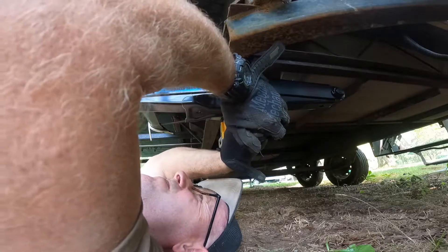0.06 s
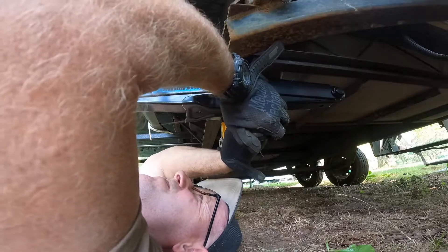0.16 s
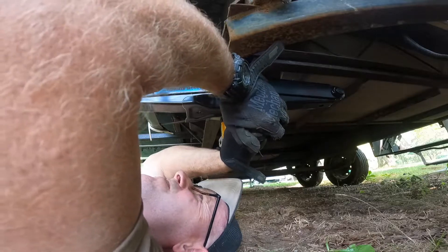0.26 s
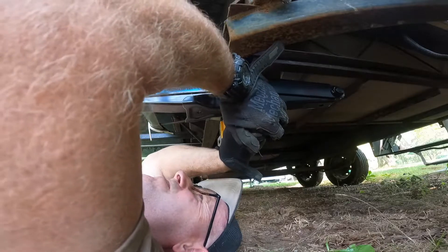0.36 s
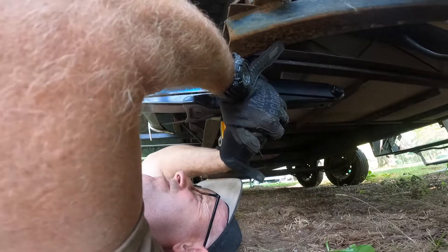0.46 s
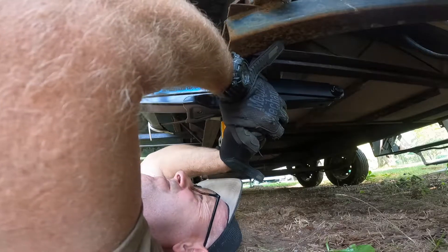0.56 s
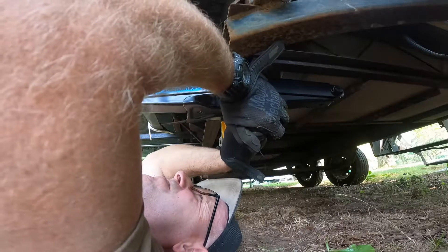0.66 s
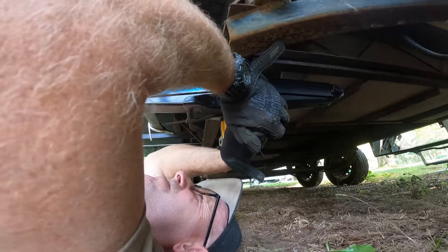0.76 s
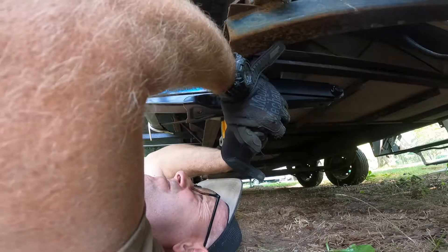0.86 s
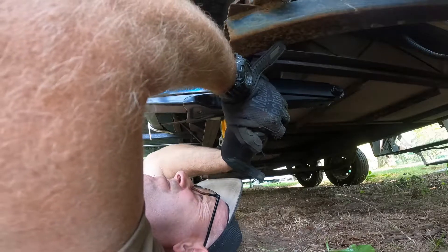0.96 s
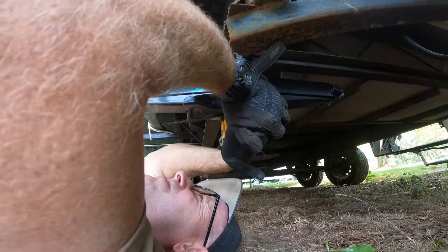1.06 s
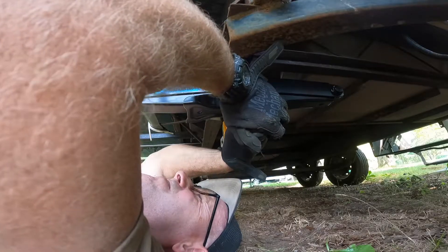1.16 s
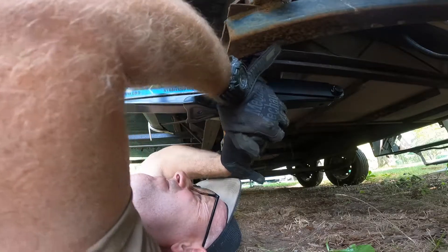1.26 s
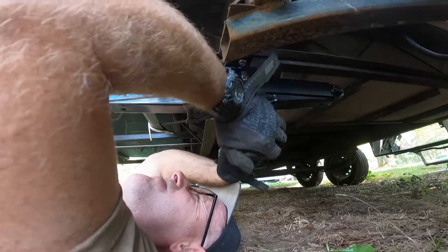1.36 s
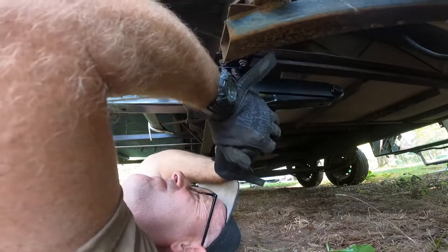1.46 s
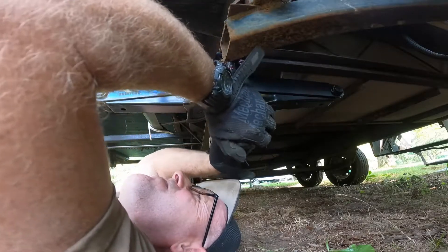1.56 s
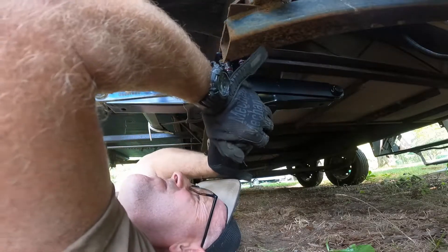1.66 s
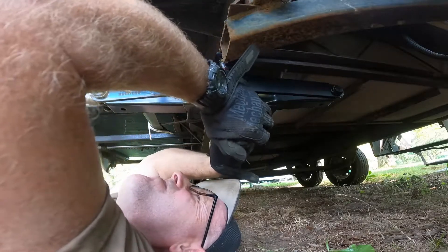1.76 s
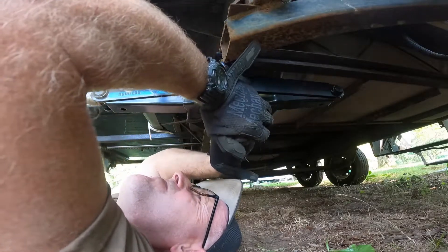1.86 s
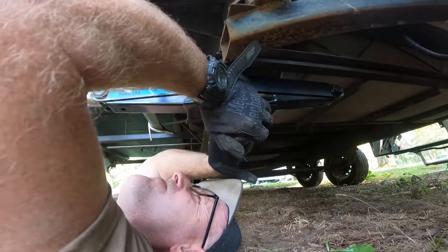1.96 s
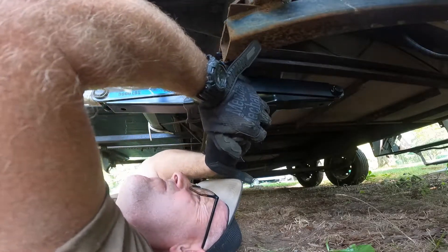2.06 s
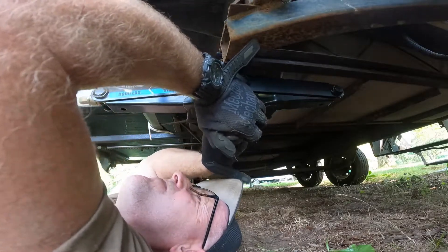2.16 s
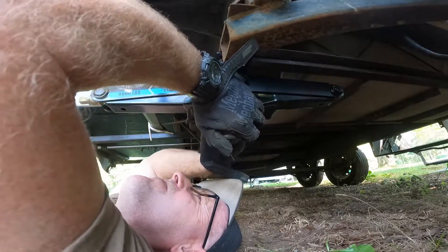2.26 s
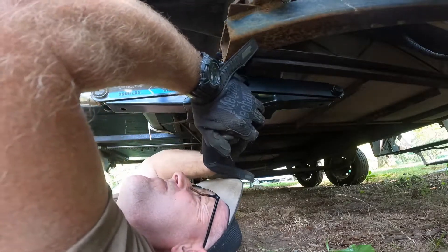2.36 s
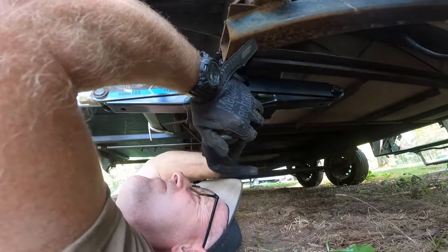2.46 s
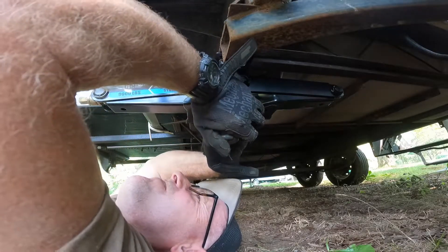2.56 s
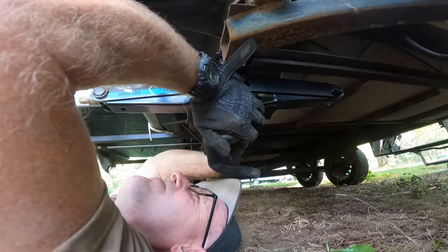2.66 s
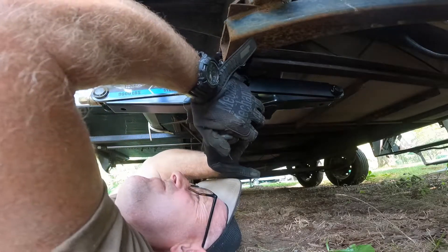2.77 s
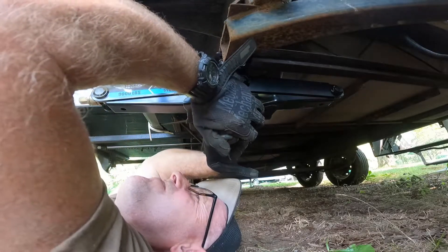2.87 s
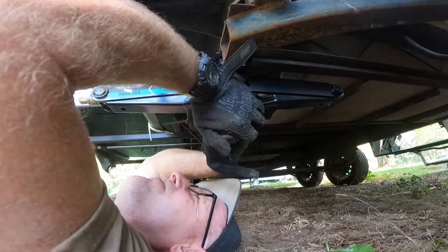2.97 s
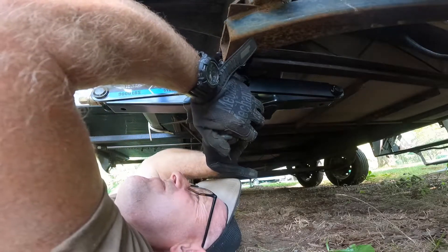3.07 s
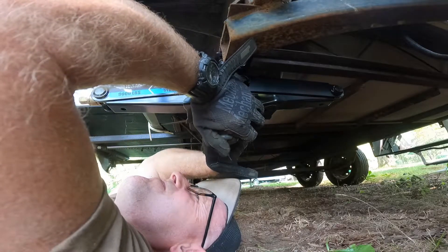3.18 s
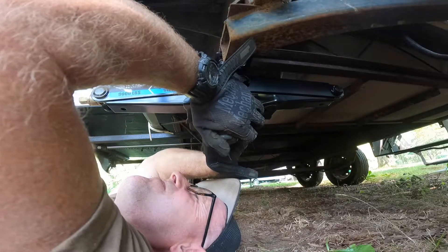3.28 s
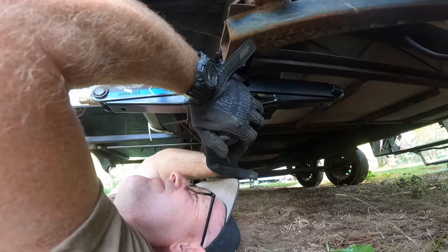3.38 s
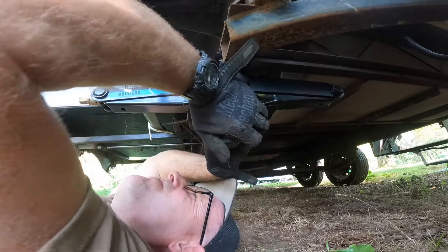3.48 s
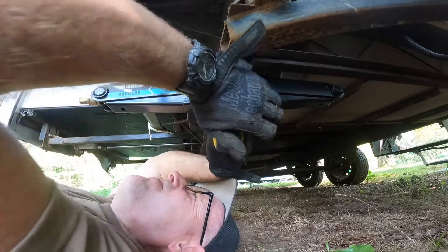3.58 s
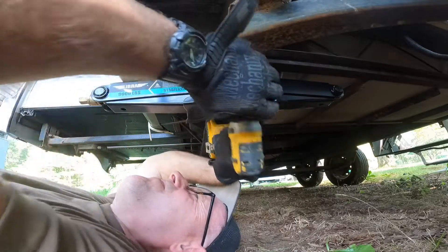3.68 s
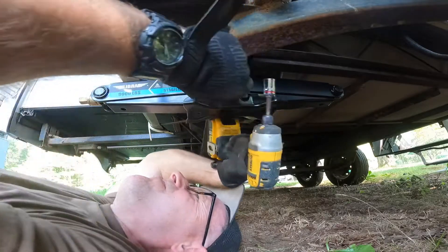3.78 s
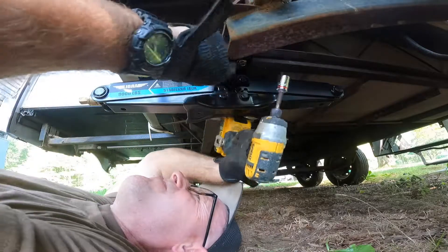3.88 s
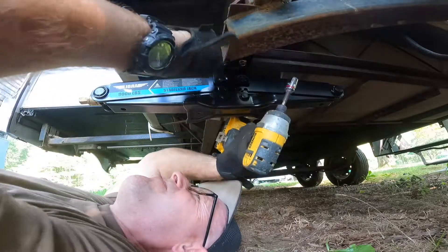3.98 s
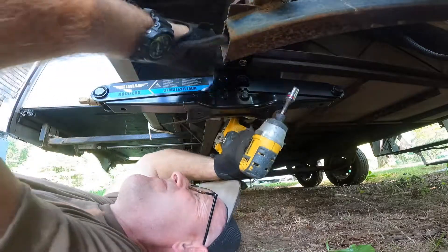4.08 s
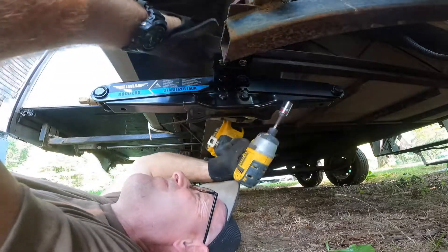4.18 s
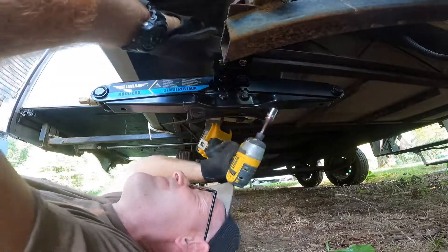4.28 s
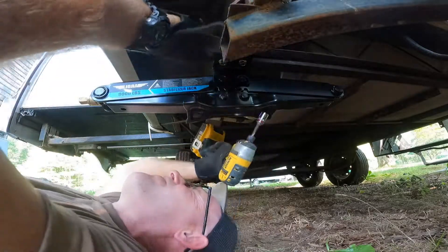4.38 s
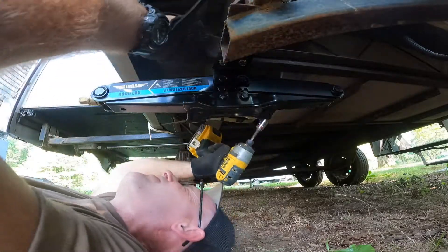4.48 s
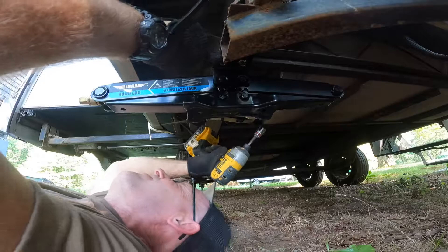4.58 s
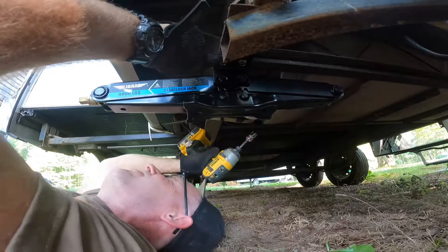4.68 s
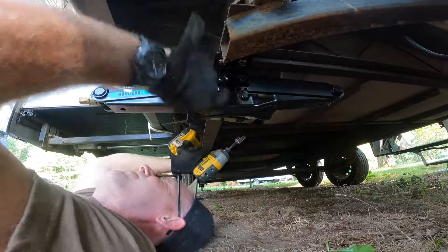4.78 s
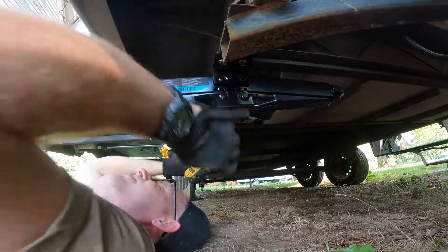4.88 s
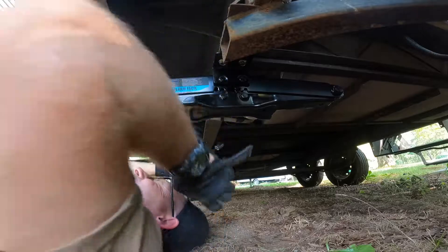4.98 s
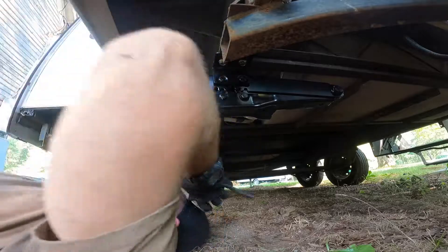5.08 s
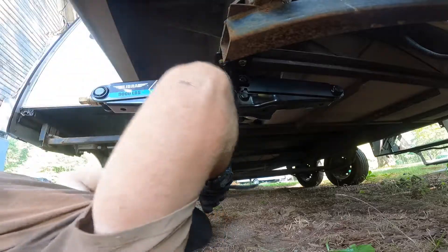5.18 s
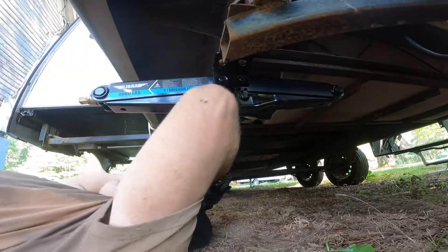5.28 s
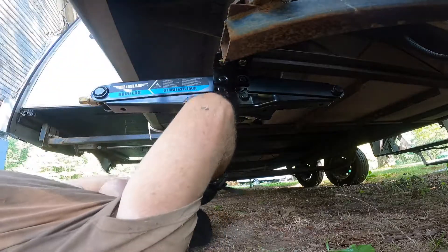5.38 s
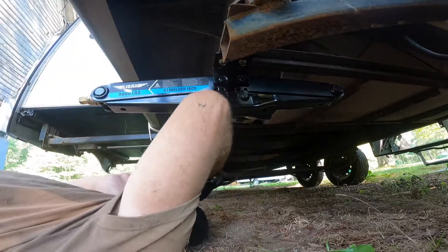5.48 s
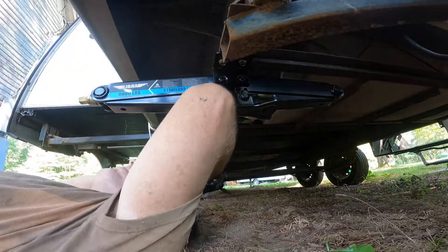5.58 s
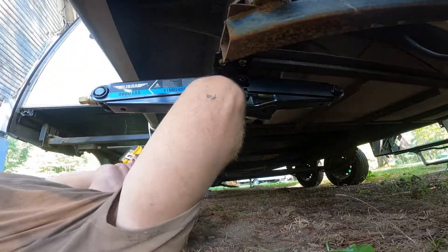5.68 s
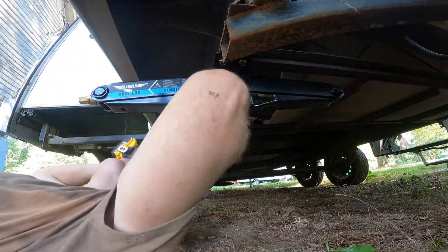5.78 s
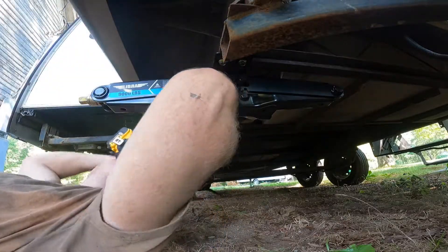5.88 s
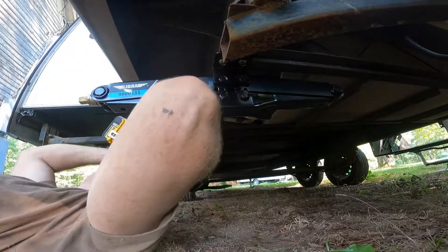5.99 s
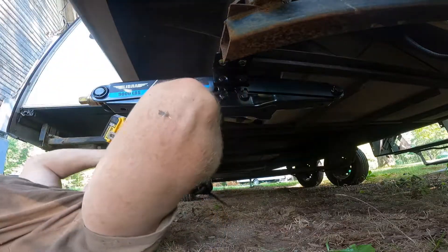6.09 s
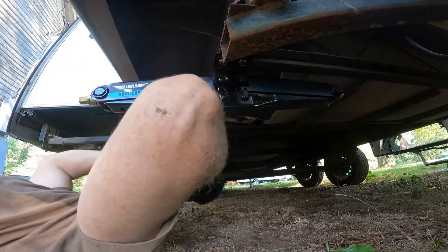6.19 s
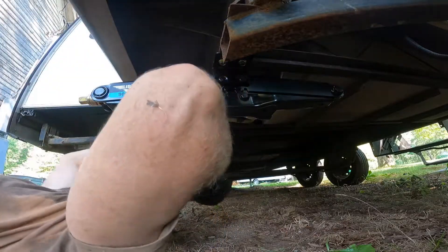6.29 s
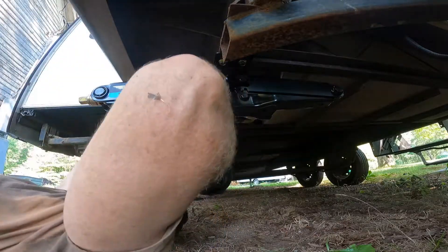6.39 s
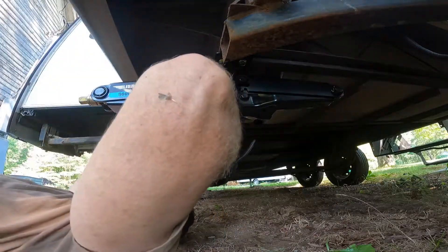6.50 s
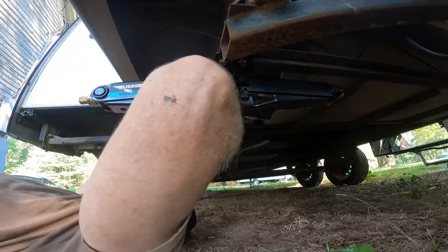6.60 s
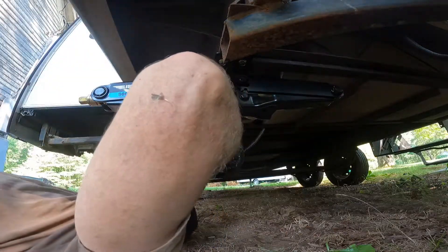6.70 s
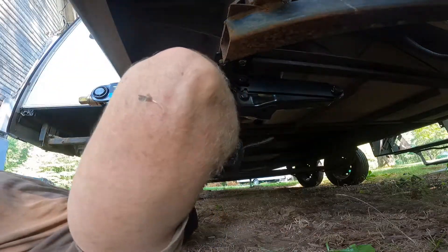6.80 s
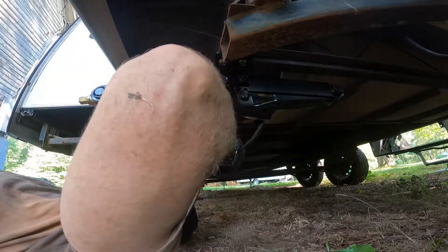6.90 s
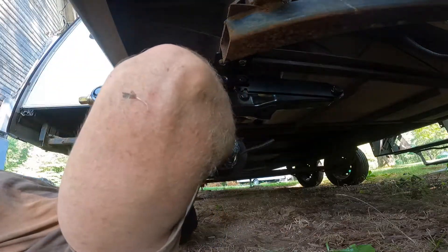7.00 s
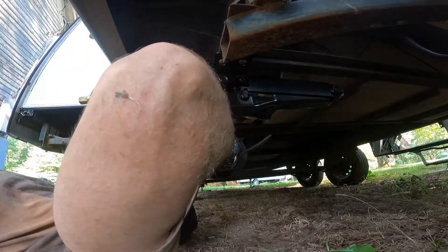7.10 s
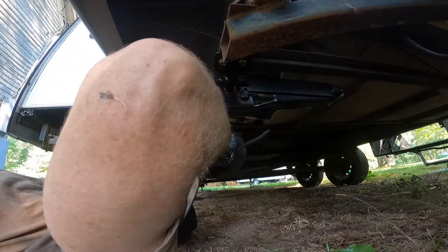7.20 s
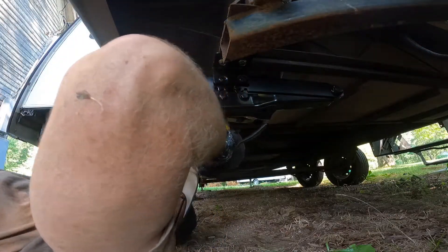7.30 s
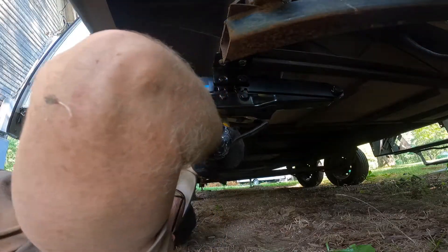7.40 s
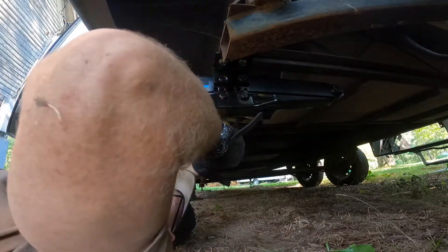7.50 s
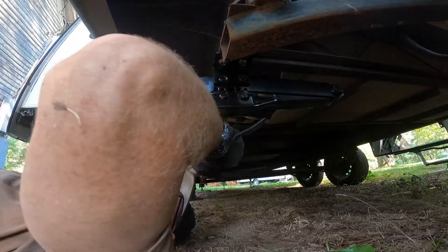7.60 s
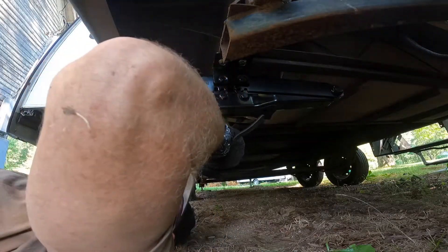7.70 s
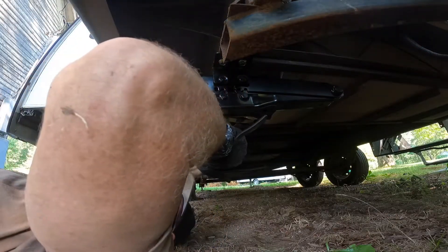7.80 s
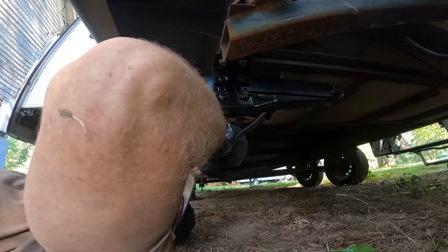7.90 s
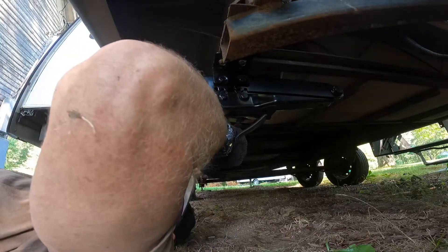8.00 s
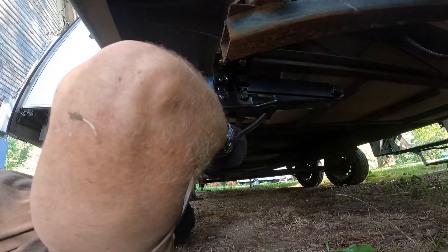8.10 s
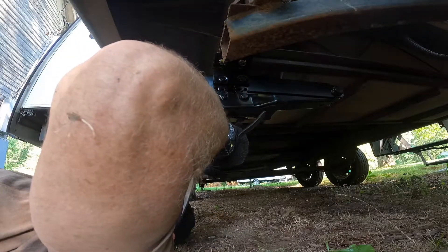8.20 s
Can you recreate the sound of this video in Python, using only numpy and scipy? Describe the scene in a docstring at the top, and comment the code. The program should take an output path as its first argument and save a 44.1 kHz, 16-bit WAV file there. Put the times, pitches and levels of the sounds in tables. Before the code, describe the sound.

Close, dry outdoor sound beneath a steel trailer. From about 0.1 s an impact driver spins up and hammers loudly until 1.4 s, about sixty blows a second, bright and clattering, its pace sagging and recovering near the end. The frame rings on. Small socket knocks scatter from 1.6 to 2.3 s, with a low soft rumble near 2.35 and a thin high whine swelling just before the second burst, 2.5 to 3.55 s, which slows as it ends and the motor runs down. A light tick follows at 3.65. At 4.4 to 4.7 s a wrench clinks sharply three times and chatters to rest. The faint far engine drone and low rush then rise, with light rustles near 5.7 and 6.0. A hard knock lands at 6.9, a cluster around 7.3, smaller ones after, then a short third burst from 7.7 s, with a last knock near 8.2.

```python
"""An engine drones far off as a cordless impact driver runs a bolt into a steel trailer frame, close by.
Its hammer strikes up to about sixty times a second, and each blow rings the steel. Then the socket knocks
on the frame, a low rumble is heard, the speed control whines and a second burst follows. A wrench clinks
and chatters to rest, the background level comes up, and more knocks lead to the third burst and a last knock.
Blows are pulses and noise sent through resonances; a limiter holds the loud parts down."""
import sys
import numpy as np
from scipy import signal
from scipy.fft import rfft, irfft
from scipy.io import wavfile
from scipy.ndimage import uniform_filter1d

SR = 44100
rng = np.random.default_rng(int(sys.argv[2]) if len(sys.argv) > 2 else 0)


def dump_mix(stems):
    """Bounce the given channels to the path in sys.argv[1] as a 16-bit WAV at rate SR."""
    frames = np.atleast_2d(stems).T  # one column per channel
    limited = np.clip(frames, -1, 1)  # hard clip at full scale
    pcm = np.round(limited * 32767).astype(np.int16)
    wavfile.write(sys.argv[1], SR, pcm)


N = 363825
TIME = np.arange(N) / SR  # seconds
TINY = 1e-18 * np.sin(np.arange(N))  # far too faint to hear; keeps filter inputs from being exactly zero

# Level of the background, which comes up later on. Each row: time in seconds, level in dB.
BACKGROUND = [(2.0, -58), (3.8, -59.5), (4.9, -51), (5.3, -48), (6.1, -42), (7.7, -41.5)]
# Steady tones of the far engine. Each row: pitch in Hz, relative level in dB.
DRONE = [(59.2, -60.5), (80.7, -57), (113.0, -53.5), (161.5, -43), (269.2, -57.5)]
# Tone colour of the outdoor rush. Each row: frequency in Hz, relative level in dB per Hz.
RUSH = [(15, -64), (25, -20), (43, -28), (128, -17), (162, -7.5), (217, -12.5), (260, -12.5), (808, -23.5),
        (997, -28), (4470, -41), (8500, -58.5), (11800, -58), (13500, -68)]

# Pulls of the trigger. Each row: time up to speed in seconds, spin-up in dB per second,
# extra whirr before the load in dB, time let go in seconds, run-down in dB per second.
PULLS = [(0.072, 400, 14.5, 1.2, 800), (2.48, 438, 5, 3.572, 260), (7.73, 3500, 2.5, 8.3, 235)]
WHIRR_DB, LOAD_S = -26.5, 0.036  # level of the gears under load; time in which the load slows them
COAST_DB, COAST_LOSS_DB_PER_S = -55, 39.5  # after the brake the gears coast faintly

# Tone colour of the blows. Each row: frequency in Hz, relative level in dB per Hz.
BOLT_COLOUR = [(240, -35.5), (400, -4.5), (553, -14), (641, 3), (886, -2.5), (1120, -0.5), (2110, -2),
               (2630, 1), (3700, -0.5), (4280, 0.5), (6760, -5.5), (8940, -7), (11800, -12.5),
               (13500, -29.5)]
# Resonances of bolt and bracket, one list for each run of hammering.
# Each row: pitch in Hz, width in Hz, relative level in dB.
BOLT_PEAKS = [
    [(1860, 58, 4), (1960, 320, 3.5), (2540, 30, -21.5), (3048, 170, 3.5), (3370, 330, -8), (4434, 33, 8),
     (4440, 110, -5.5), (6100, 98, -6.5), (7500, 24, -17)],
    [(1020, 750, -9.5), (2305, 18, 3), (2560, 200, -1), (2982, 37, 7.5), (4580, 110, -10), (5050, 40, 2.5),
     (6000, 170, -6.5)],
    [(2623, 56, -4), (3876, 63, 9), (3908, 77, 6.5), (4560, 61, -11.5), (5106, 54, 5), (5630, 64, -2.5),
     (6040, 55, 2.5), (6790, 140, 5)],
    [(710, 85, -19), (2662, 160, 5.5), (3340, 110, -5), (3760, 39, 4.5), (4133, 54, -4), (5750, 39, 0.5),
     (6270, 43, -30.5)],
]
# Low resonances of the chassis. Each row: pitch in Hz, width in Hz, relative level in dB.
CHASSIS = [(60.3, 16, -17.5), (125.4, 52, -4.5), (159, 37, 3), (202, 29, 0.5), (241.7, 21, 5), (292, 31, 5),
           (397.4, 16, -8), (493, 110, -11)]
# Resonances of the bracket, which sing when a multiple of the hammer rate meets them.
# Each row: pitch in Hz, width in Hz, relative level in dB.
BRACKET = [(627.6, 18, 10), (1823, 30, 1.5), (1920, 290, -5), (3355, 160, 3.5), (4410, 34, -0.5)]
# Resonances of the floor panel. Each row: pitch in Hz, width in Hz, relative level in dB.
PANEL = [(81, 15, -1), (139, 23, 4)]
# Hammer speed, one list for each run; the first burst has two runs, as the bolt takes up load.
# Each row: time in seconds, blows per second.
SPEED = [
    [(.077, 37.9), (.2, 57.3), (.4, 63.2), (.65, 63.1), (.79, 62)],
    [(.799, 63.3), (.9, 61.6), (1.0, 54.3), (1.15, 58.8), (1.25, 48.8), (1.405, 62.1)],
    [(2.508, 31.4), (2.6, 48.3), (2.82, 58.1), (3.36, 57.3), (3.46, 51.5), (3.55, 46.9)],
    [(7.737, 44.5), (7.86, 53.8), (8.02, 63.1), (8.245, 61.9)],
]
# Force of each run, and how it begins and ends. Each row: clatter in dB, mid-range rattle in dB,
# frame shudder in dB, looseness from 0 to 1, change of shudder in the bite in dB, floor boom in dB,
# fade at the end in dB.
RUNS = [(-13.5, -33.5, -38.5, 0.4, 13, -38, 1), (-13.5, -22.5, -32.5, .75, -8.5, -61, 13),
        (-13.5, -22.5, -33.5, .55, 6, -30.5, 3.5), (-13, -27.5, -35, .62, 20.5, -31, 0)]
BITE_LEAD_S, BITE_PEAK_S = 0.014, 0.075  # the bite starts before the first blow; time from there to its peak
BITE_IN_CLATTER, BITE_IN_RATTLE = 0.17, 0.75  # shares of the shudder's dB change
UNSEAT_S, FADE_S = 0.083, 0.037  # towards the end of a run the socket works loose, then the blows fade

# Long ring of the frame. Each row: pitch in Hz, relative level in dB, time to fall by 60 dB in seconds.
FRAME = [(402, 2.5, 3.8), (629, -3, 0.52), (688, -4, 0.33), (996, -4.5, 0.946), (2175, -5, 0.21),
         (2637, -8, 0.072), (3010, -5, 0.16), (3747, -15, 0.27), (5750, -17.5, .4)]

# The socket knocks on bolt and frame. Each row: time in seconds, relative level in dB,
# bass boost in dB, treble boost in dB.
KNOCKS = [(1.639, -22.5, -15, 8), (1.747, -33.5, 9.5, 3), (1.792, -36.5, -7, 11), (1.84, -41, -5, 11.5),
          (1.872, -32.5, -20, 16.5), (1.939, -40.5, -22, 18.5), (2.011, -43, 2.5, -8),
          (2.205, -44.5, 19, 9), (2.29, -42, 11, -5), (2.329, -30.5, 12.5, -1), (3.653, -35, -0.5, 16),
          (4.88, -44, 20.5, -6), (6.91, 3.5, -22.5, -22), (7.268, -1.5, -17, 3.5), (7.287, -5, 1.5, 6.5),
          (7.322, -4, 1, 4), (7.378, -29, 27.5, 9), (7.53, -19, 14, 8.5), (7.629, -35.5, 22, 3),
          (8.225, -2.5, 3, -14)]
# Tone colour of the knocks. Each row: frequency in Hz, relative level in dB per Hz.
KNOCK_COLOUR = [(240, -57), (400, -30), (660, -2.5), (926, -10), (1880, -7), (2380, -11.5), (4350, -2.5),
                (8940, -24.5), (10700, -26.5), (13500, -39.5)]
# Resonances of the knocked steel. Each row: pitch in Hz, width in Hz, relative level in dB.
KNOCK_PEAKS = [(674, 20, 3.5), (1530, 22, 0), (1780, 9.4, -4.5), (1850, 57, 2), (2673, 24, -5),
               (3130, 92, -2), (3940, 14, -9.5), (4500, 92, -4), (5330, 29, -0.5)]
# The 60 dB fall time of a knock at 0 dB in KNOCKS, and the rise in level that doubles this time.
KNOCK_T60_S, KNOCK_T60_DOUBLES_DB = 0.12, 60

# Soft rustles, a low rumble and a scrape. Each row: middle in seconds, half length in seconds,
# level in dB, centre in Hz, width in Hz.
RUSTLES = [(2.35, 0.11, -45.5, 239, 200), (4.0, 0.1, -62, 3500, 4000), (4.917, 0.046, -53.5, 2000, 2500),
           (5.68, 0.15, -52, 3900, 7040), (5.97, 0.18, -46, 1980, 600), (7.466, 0.016, -49, 4000, 3000),
           (7.66, .02, -42.5, 1279, 1600)]

# A light trigger makes the speed control whine. Each row: on in seconds, full in seconds, off in seconds.
# A row that goes off before it comes on stays silent.
WHINES = [(2.245, 2.423, 2.505), (7.725, 7.728, 6.9)]
# Steady second and third multiples of the whine's pitch. Each entry: level in dB.
WHINE_PARTS = [-68, -74]
WHINE_HZ, WHINE_DB, WHINE_SWELL_DB_PER_S = 3910, -37, 220  # the lowest tone

# Touches that ring at one pitch: dull bumps, and the socket slipping off its bolt.
# Each row: start in seconds, peak dB, pitch in Hz, rise in seconds.
BUMPS = [(4.314, -38.5, 345, .003), (3.654, -38.5, 2610, 0.0079), (7.378, -26, 362, 0.0034)]

# The wrench drops on the steel. Each row: time in seconds, relative level in dB, bass boost in dB,
# treble boost in dB, time for the clatter to fall by 60 dB in seconds.
CLINKS = [(4.412, -1, 0, -8, 0.036), (4.472, -0.5, -24, -2, 0.041), (4.559, -12, 7.5, 7.5, 0.055)]
# Tone colour of the clinks. Each row: frequency in Hz, relative level in dB per Hz.
CLINK_COLOUR = [(240, -65), (400, -61), (631, -2.5), (899, -14.5), (997, -4), (1740, -33.5), (1960, -11),
                (3140, 5), (5040, -7), (5750, -2.5), (13500, -32)]
# Resonances of the clinks. Each row: pitch in Hz, width in Hz, relative level in dB.
CLINK_PEAKS = [(1764, 49, 5), (2870, 18, -4), (3600, 62, -10), (4160, 60, -9), (4250, 24, 5),
               (5460, 54, -16), (6250, 49, -3), (6600, 48, -2)]
SETTLE_S, SETTLE_GAP_S = 4.609, 0.0285  # the wrench then chatters to rest: first tap, time between taps
# Relative level of the first tap, loss at each further tap, and the 60 dB fall time of a tap.
SETTLE_DB, SETTLE_LOSS_DB, SETTLE_T60_S = -29.5, 3.5, 0.067

CUTOFF_HZ = 13500  # top of the finished sound


def from_db(db):
    """Turn decibels into a gain."""
    return 10 ** (np.asarray(db) / 20)


def rms_one(x):
    """Scale a sound to unit power."""
    return x / np.sqrt(np.mean(x ** 2) + 1e-20)


def cut(x, hz, kind, order=2):
    """Keep only the low, high or band part of a sound (Butterworth filter)."""
    sos = signal.butter(order, hz, kind, fs=SR, output="sos")
    return signal.sosfilt(sos, x + TINY[:len(x)])


def drift(rate):
    """Chance that wanders between random points, `rate` of them a second, with a spread near 1."""
    knots = rng.standard_normal(4000)
    return np.interp(TIME * rate, np.arange(len(knots)), knots)


def colour(x, spectrum):
    """Give a sound a tone colour, with no sound ahead of its cause (minimum phase) and unit power gain."""
    size = 4096
    hz, db = np.transpose(spectrum)
    bins_hz = np.arange(size // 2 + 1) * SR / size
    level = np.interp(np.log(bins_hz + 1), np.log(hz), db)
    # folding the cepstrum forwards gives the minimum-phase response
    cepstrum = irfft(np.log(from_db(level)))
    cepstrum[1:size // 2] *= 2
    cepstrum[size // 2 + 1:] = 0
    response = irfft(np.exp(rfft(cepstrum)))
    return signal.oaconvolve(x, response / np.linalg.norm(response))[:len(x)]


def resonate(x, peaks):
    """Ring resonances side by side, with alternating signs; a narrower one rings longer."""
    out = 0
    for k, (hz, width, db) in enumerate(peaks):
        r = np.exp(-np.pi * abs(width) / SR)
        poles = [1, -2 * r * np.cos(2 * np.pi * hz / SR), r * r]
        ring = signal.lfilter([1, 0, -1], poles, x + TINY)
        out = out + (-1) ** k * from_db(db) * (1 - r * r) / 2 * ring
    return out


def steel(force, spectrum, peaks, peaks_db):
    """A steel part rings as a dense bed of modes with a few that stand out."""
    bed, rings = colour(force, spectrum), resonate(force, peaks)
    matched = rings * bed.std() / rings.std()
    return (bed + from_db(peaks_db) * matched) / np.hypot(1, from_db(peaks_db))


def levelled(x, window=0.057):
    """Even out the power over a few blows."""
    power = np.maximum(uniform_filter1d(x * x, int(window * SR)), 0)
    return x / np.sqrt(power + 0.3 * np.var(x))


def outdoors(drone_db=0.0, low_db=-6.0, low_follows=0.89, high_db=-8.5, waver=0.88, flutter_db=0.0):
    """A far engine's wavering tones lie over a broad rush of noise; all rise and fall together."""
    level = np.interp(TIME, *np.transpose(BACKGROUND))
    lines = 0
    for hz, db in DRONE:
        gain = from_db(db + flutter_db * drift(14))
        lines = lines + gain * np.sin(2 * np.pi * hz * TIME + waver * drift(14))
    air = colour(rng.standard_normal(N), RUSH)
    low = from_db(low_follows * level + low_db) * rms_one(cut(air, 750, "low", order=3))
    high = from_db(level + high_db) * rms_one(cut(air, 1000, "high", order=3))
    return from_db(level + drone_db) * rms_one(lines) + low + high


def motor(grain_db=2.5, top_hz=5200):
    """Gears rattle the socket: they spin up, are slowed by the load, then brake and coast once let go."""
    level = 0
    for up, rise, free_db, off, fall in PULLS:
        free = free_db * np.exp(-np.maximum(TIME - up, 0) / LOAD_S)
        spin_up = rise * np.clip(up - TIME, 0, 0.5)
        run_down = fall * np.clip(TIME - off, 0, 0.5)
        coast = from_db(COAST_DB - COAST_LOSS_DB_PER_S * np.abs(TIME - off))
        level = level + from_db(WHIRR_DB + free - spin_up - run_down)
        level = level + (TIME > off) * coast
    gears = cut(rng.standard_normal(N) * from_db(grain_db * drift(400)), top_hz, "low")
    return level * rms_one(steel(gears, BOLT_COLOUR, BOLT_PEAKS[1], peaks_db=-15.5))


def panel():
    """The trailer's floor is shaken at its two lowest modes, by noise."""
    return rms_one(cut(resonate(rng.standard_normal(N), PANEL), [55, 200], "band"))


def runs_in_time():
    """Give the current run's row at every moment, its bite (0 to 1) and the time left in it (seconds)."""
    starts, stops = np.transpose([(run[0][0] - BITE_LEAD_S, run[-1][0]) for run in SPEED])
    current = np.maximum(np.searchsorted(starts, TIME) - 1, 0)
    age = np.maximum(TIME - starts[current], 0) / BITE_PEAK_S
    bite = age * np.exp(1 - age)
    left = np.maximum(stops[current] - TIME, -FADE_S)
    return np.array(RUNS)[current].T, bite, left


def blow_times(speed):
    """One blow falls each time the hammer has turned on to its next lug."""
    t = np.arange(speed[0][0], speed[-1][0], 1 / SR)
    turned = np.cumsum(np.interp(t, *np.transpose(speed))) / SR
    return np.interp(np.arange(int(turned[-1]) + 1), turned, t)


def hammer(speed, loose, clatter_t60=0.1, crack_db=-11.5, crack_t60=0.0097, uneven_db=2.0,
           slip_s=0.00037, repeat_hz=1400):
    """Each blow sets off chatter: partly the same every time, partly new when the socket is loose."""
    at = blow_times(speed)
    chance = rng.standard_normal((len(at), 2))
    at = at + slip_s * np.interp(at, TIME, loose) ** 4 * chance[:, 0]
    blows = np.zeros(N)
    blows[np.clip(at * SR, 0, N - 1).astype(int)] = from_db(uneven_db * chance[:, 1])
    t = TIME[:SR // 8]
    dying = from_db(-60 * t / clatter_t60) + from_db(crack_db - 60 * t / crack_t60)
    alike = signal.oaconvolve(blows, dying * rng.standard_normal(len(t)))[:N]
    fresh_power = np.abs(signal.oaconvolve(blows ** 2, dying ** 2)[:N])
    fresh = np.sqrt(fresh_power) * rng.standard_normal(N)
    # small slips scramble the treble first; the long waves repeat more faithfully
    bass = np.sqrt(1 - loose ** 3) * alike + np.sqrt(loose ** 3) * fresh
    treble = np.sqrt(1 - loose) * alike + np.sqrt(loose) * fresh
    return blows, cut(bass, repeat_hz, "low", order=1) + cut(treble, repeat_hz, "high", order=1)


def driver(peaks_db=-3.5, shake_db=7.0, sing_db=-34.5):
    """Blows ring bolt and bracket and shake the chassis; the first bite changes their level."""
    (high, mid, low, play, bite_db, boom_db, fade_db), bite, left = runs_in_time()
    loose = np.clip(play + (1 - play) * np.maximum(bite, np.exp(-left / UNSEAT_S)), 0, 1)
    extra, fade = bite_db * bite, fade_db * np.exp(-left / FADE_S)
    blows, forces = zip(*[hammer(speed, loose) for speed in SPEED])
    all_blows = sum(blows)

    metal = sum(steel(force, BOLT_COLOUR, peaks, peaks_db) for force, peaks in zip(forces, BOLT_PEAKS))
    clatter = from_db(high + BITE_IN_CLATTER * extra) * levelled(cut(metal, 1700, "high", order=3))
    rattle = from_db(mid + BITE_IN_RATTLE * extra) * levelled(cut(metal, 1600, "low", order=3))

    push = rms_one(all_blows) + from_db(shake_db) * loose ** 2 * rms_one(sum(forces))
    shaken = cut(resonate(push, CHASSIS), [50, 580], "band", order=3)
    shudder = from_db(low + extra) * levelled(shaken)

    seated = (1 - loose) ** 2  # a well seated socket passes the blow straight on
    sing = from_db(sing_db) * rms_one(resonate(seated * all_blows, BRACKET))
    boom = from_db(boom_db) * bite ** 2 * panel()
    return from_db(-fade) * (clatter + rattle + shudder) + sing + boom


def frame_ring(x):
    """The long beams go on ringing after they are struck."""
    # a mode's width in Hz follows from how fast it dies away
    return resonate(x, [(hz, np.log(1000) / (np.pi * t60), db) for hz, db, t60 in FRAME])


def strikes(events, tail_db, tail_t60):
    """Steel meets steel: a dense clatter that dies fast, and a weak tail from under the chassis."""
    force, t = np.zeros(N + SR), TIME[:SR // 2]
    for s, db, bass_db, treble_db, t60 in events:
        dying = from_db(-60 * t / max(t60, 0.005)) + from_db(tail_db - 60 * t / tail_t60)
        hit = rng.standard_normal(len(t)) * dying
        hit = hit + (from_db(bass_db) - 1) * cut(hit, 1100, "low", order=1)
        hit = hit + (from_db(treble_db) - 1) * cut(hit, 4700, "high", order=1)
        start = int(s * SR)
        force[start:start + len(t)] += from_db(db) * hit
    return force[:N]


def socket_knocks(knock_db=-9.0):
    """The socket knocks on bolt and frame; harder knocks clatter longer."""
    events = []
    for s, db, bass, treble in KNOCKS:
        events.append((s, db, bass, treble, KNOCK_T60_S * 2 ** (db / KNOCK_T60_DOUBLES_DB)))
    force = strikes(events, tail_db=-16.5, tail_t60=0.21)
    return from_db(knock_db) * steel(force, KNOCK_COLOUR, KNOCK_PEAKS, peaks_db=-5.5)


def rustle(per_s=2500, size_db=0.5, clump_db=3.0):
    """Each handling noise swells and fades: clumps of tiny snaps with a colour of their own."""
    size = from_db(size_db * np.minimum(rng.exponential(1, N), 4))
    snaps = (rng.random(N) < per_s / SR) * rng.standard_normal(N) * size
    snaps = cut(snaps, 7000, "low") * from_db(clump_db * drift(25))
    out = 0
    for s, half, db, hz, width in RUSTLES:
        swell = np.exp(-np.minimum(((TIME - s) / half) ** 2, 20))
        out = out + from_db(db) * swell * rms_one(resonate(snaps, [(hz, width, 0)]))
    return out


def whine(edge_s=0.005):
    """The speed control whines as the trigger is squeezed: the lowest tone swells under steady overtones."""
    out, phase = 0, 2 * np.pi * WHINE_HZ * TIME
    overtones = sum(from_db(db) * np.sin(k * phase) for k, db in enumerate(WHINE_PARTS, 2))
    for on, full, off in WHINES:
        gate = np.clip(np.minimum(TIME - on, off - TIME) / edge_s, 0, 1)
        swell = from_db(WHINE_DB - WHINE_SWELL_DB_PER_S * np.clip(full - TIME, 0, 1))
        out = out + gate * (swell * np.sin(phase) + overtones)
    return out


def touches():
    """A light touch is one sine tone that rises quickly and dies away."""
    out = 0
    for s, db, hz, rise in BUMPS:
        age = np.maximum(TIME - s, 0)
        swell = age / rise * np.exp(1 - age / rise)
        out = out + from_db(db) * swell * np.sin(2 * np.pi * hz * age)
    return out


def wrench_clinks(clink_db=-7.5, count=4):
    """The wrench drops on the steel, then chatters to rest in ever weaker, evenly spaced taps."""
    events = list(CLINKS)
    for k in range(count):
        events.append((SETTLE_S + k * SETTLE_GAP_S, SETTLE_DB - k * SETTLE_LOSS_DB, 0, 0, SETTLE_T60_S))
    force = strikes(events, tail_db=-24.5, tail_t60=0.28)
    return from_db(clink_db) * steel(force, CLINK_COLOUR, CLINK_PEAKS, peaks_db=-11.5)


def scene(driver_ring_db=-4.5, knock_ring_db=14.5, side_db=-2.0, side_hz=11600, side_flicker=0.9):
    """All is heard from the middle; only the top treble differs between the ears."""
    tool = driver() + motor() + whine()
    handling = socket_knocks() + touches() + wrench_clinks()
    ring = frame_ring(from_db(driver_ring_db) * tool + from_db(knock_ring_db) * handling)
    mid = outdoors() + tool + ring + handling + rustle()

    # random scatter and flicker make the top treble differ between the two ears
    t = TIME[:SR // 50]
    scatter = rng.standard_normal(len(t)) * from_db(-60 * t / 0.033)
    scattered = signal.oaconvolve(mid, scatter / np.linalg.norm(scatter))[:N]
    side = from_db(side_db) * cut(scattered, side_hz, "high", order=12)
    side = side * (1 + side_flicker * drift(300)) / np.hypot(1, side_flicker)
    return np.array([mid + side, mid - side])


def record(dry, notch_hz=9080, notch_q=3.1, limit_db=-3.0, release_db_per_s=300):
    """The microphone port has a notch, a limiter catches the peaks, and the top is cut."""
    x = signal.lfilter(*signal.iirnotch(notch_hz, notch_q, fs=SR), dry)
    peak_db = 20 * np.log10(np.abs(x).max(axis=0) + 1e-9)
    over = np.maximum(peak_db - limit_db, 0)
    # the limiter clamps at once and lets go at a steady rate
    held = np.maximum.accumulate(over + release_db_per_s * TIME) - release_db_per_s * TIME
    x = x * from_db(-uniform_filter1d(held, size=9))
    return signal.sosfilt(signal.ellip(10, 0.2, 80, CUTOFF_HZ, fs=SR, output="sos"), x)


dry = scene()
out = record(dry)
dump_mix(out)
```